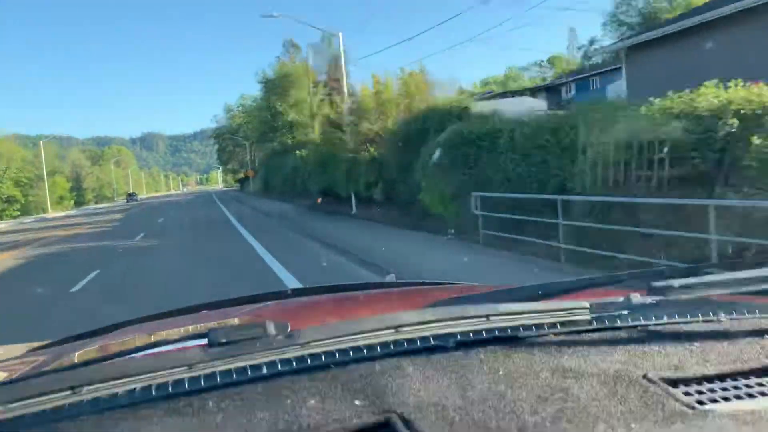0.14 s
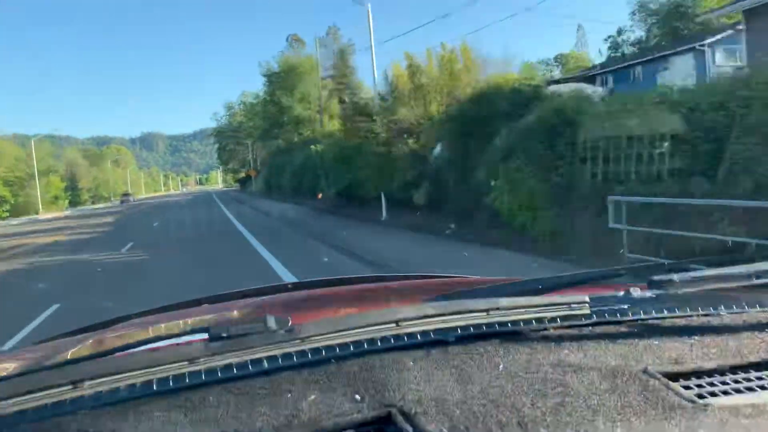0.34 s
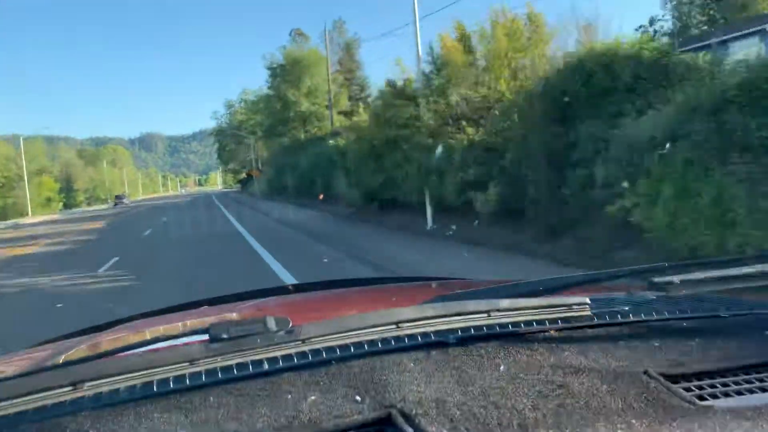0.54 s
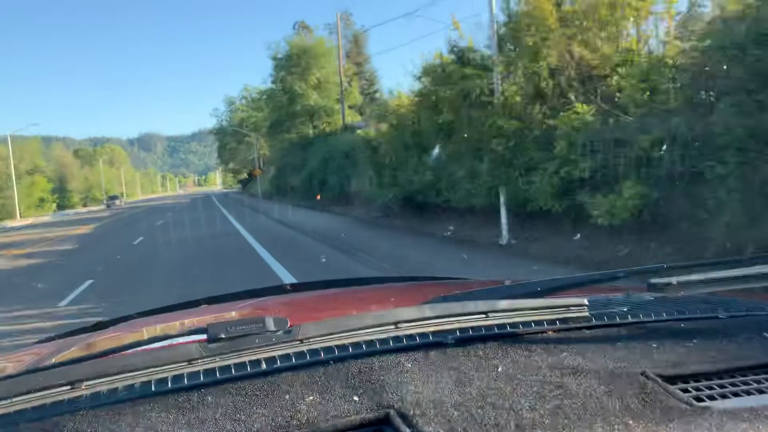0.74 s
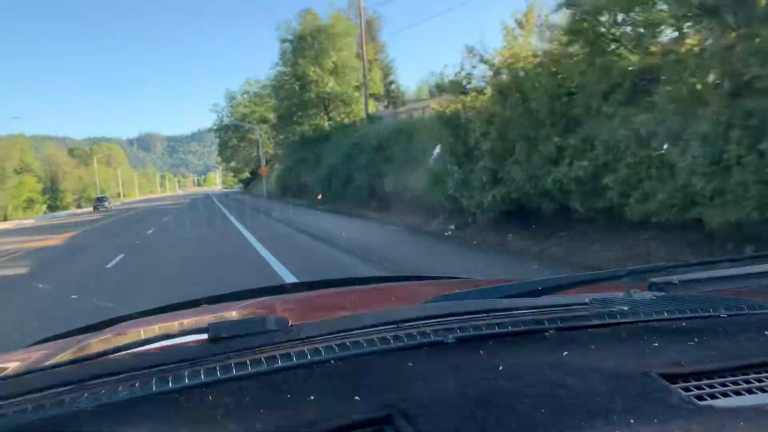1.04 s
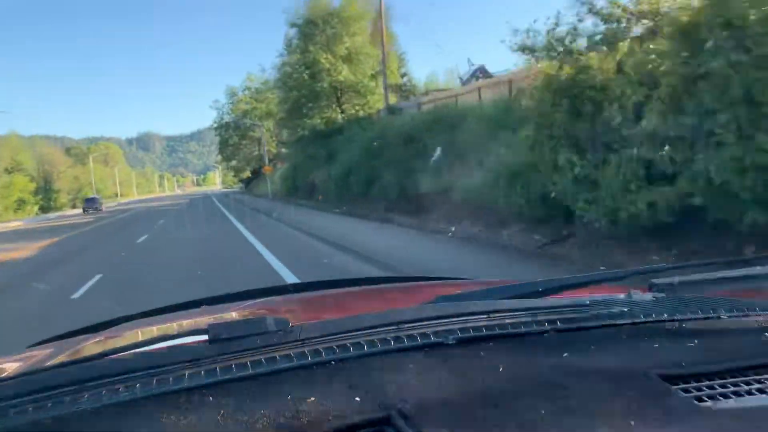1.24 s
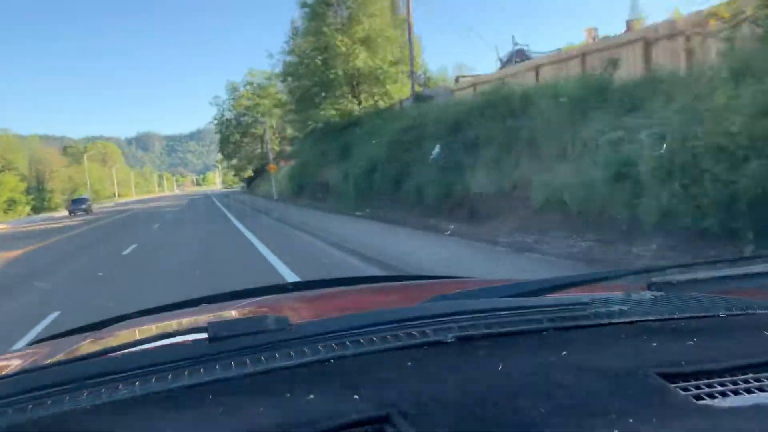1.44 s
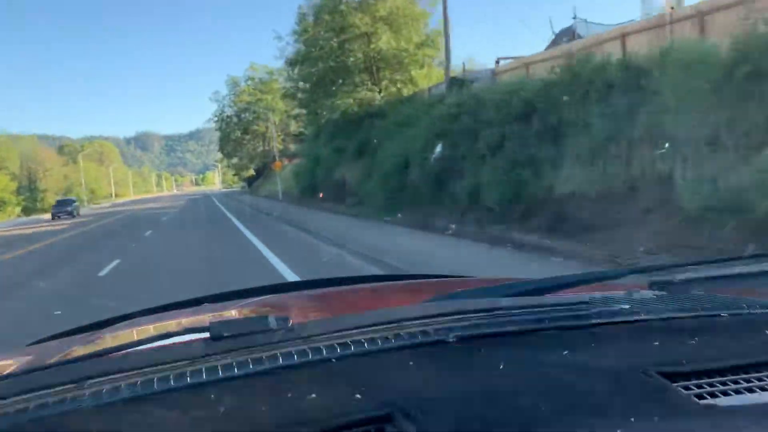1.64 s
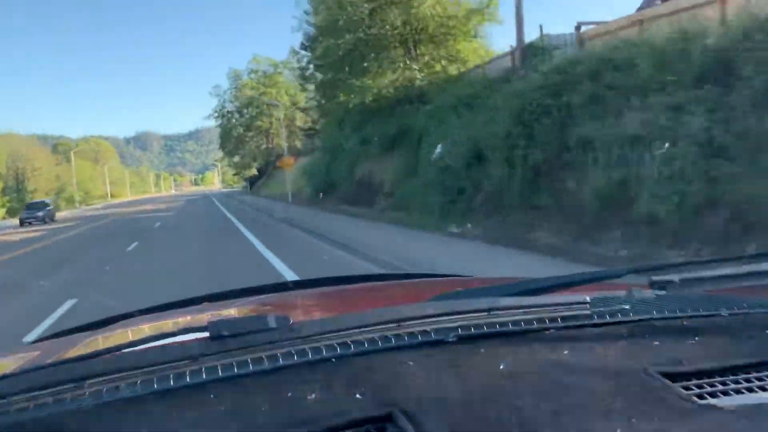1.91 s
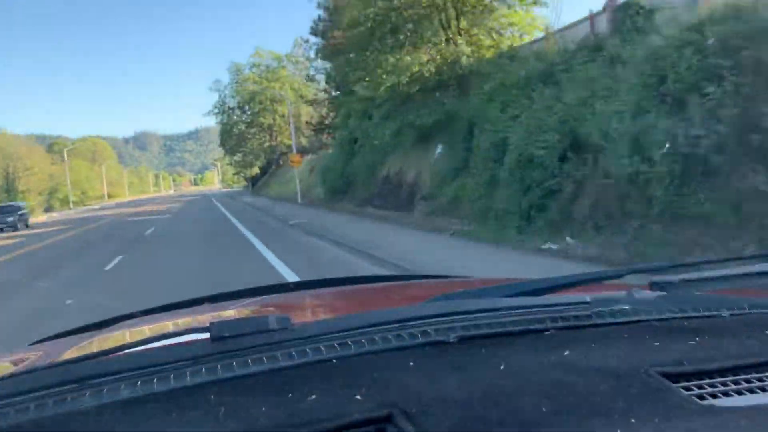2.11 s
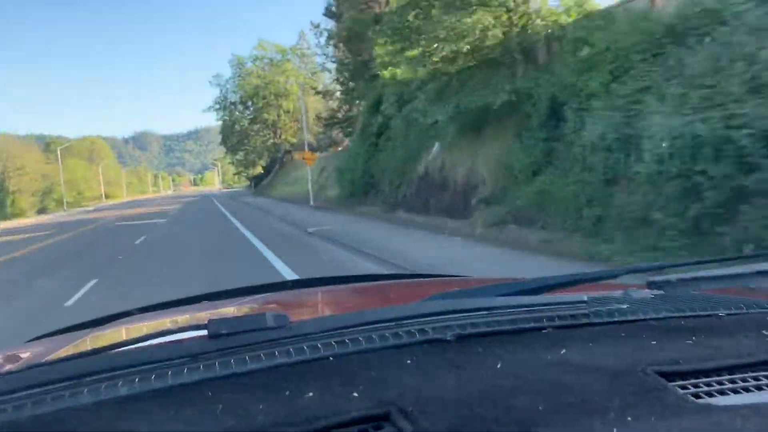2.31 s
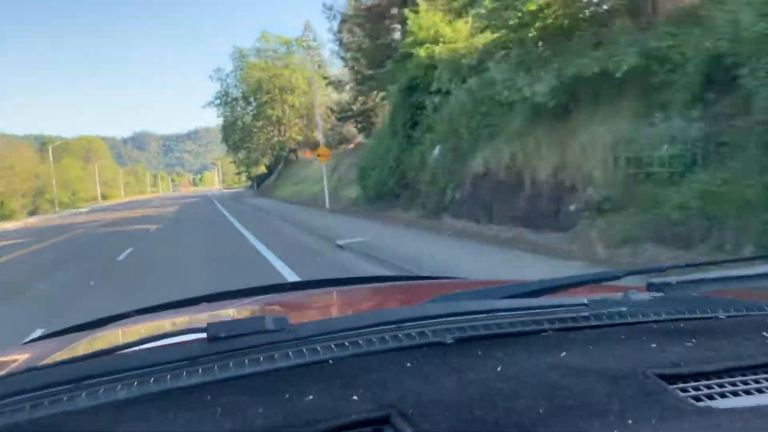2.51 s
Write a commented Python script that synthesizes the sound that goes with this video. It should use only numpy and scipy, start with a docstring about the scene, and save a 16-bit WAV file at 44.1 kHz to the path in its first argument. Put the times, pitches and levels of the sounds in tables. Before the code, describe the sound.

Turbo diesel truck engine heard inside the moving cab: a fading hiss from the last shift, deep boom and growl building with a rising turbo whistle, then throttle lift and a bright blow-off hiss ending in a squeal.

```python
"""Inside the cab of a six-cylinder turbo diesel pickup pulling through a gear. The air of the last shift dies away,
the engine booms on multiples of its crank speed, then growls as boost builds, and the turbo whistle, a narrow
moving noise band, dips and climbs. The throttle closes and the blow-off valve dumps the boost in a hiss of
coloured noise that breaks into a squeal. Road rumble and tyre roar are coloured noise, with a few dull bumps."""
import sys
import numpy as np
from scipy import signal
from scipy.fft import rfft, irfft
from scipy.io import wavfile

SR = 44100
rng = np.random.default_rng(int(sys.argv[2]) if len(sys.argv) > 2 else 0)


def dump_mix(stems):
    """Bounce the given channels to the path in sys.argv[1] as a 16-bit WAV at rate SR."""
    frames = np.atleast_2d(stems).T  # one column per channel
    limited = np.clip(frames, -1, 1)  # hard clip at full scale
    pcm = np.round(limited * 32767).astype(np.int16)
    wavfile.write(sys.argv[1], SR, pcm)


N = 117747

# Engine speed. Each row: time in seconds, firings per second.
FIRING = [(0, 94.6), (.55, 93.6), (.8, 95.7), (1.0, 96.7), (1.25, 97.3), (1.5, 98.9), (1.75, 100.7),
          (2.05, 102.2), (2.35, 103.1), (2.67, 102.7)]


def undb(db):
    """Decibels to gain."""
    return 10 ** (np.asarray(db) / 20)


def clock():
    """Time of each sample in seconds."""
    return np.arange(N) / SR


def curve(rows):
    """A time table, joined by straight lines."""
    rows = np.array(rows)
    return np.interp(clock(), rows[:, 0], rows[:, 1])


def at(rows, hz):
    """Read a spectrum on a log-frequency axis."""
    rows = np.array(rows)
    return np.interp(np.log(hz + 1e-9), np.log(rows[:, 0]), rows[:, 1])


def shape(x, gain_at):
    """Filter a signal by a gain over frequency."""
    return irfft(rfft(x) * gain_at(np.fft.rfftfreq(N, 1 / SR)), N)


def noise(gain_at):
    """Unit noise with the given gain over frequency."""
    x = shape(rng.standard_normal(N), gain_at)
    return x / x.std()


def walk(rate_hz):
    """Smooth random wander of unit spread."""
    return noise(lambda f: 1 / (1 + (f / rate_hz) ** 4))


def air(colour):
    """Coloured stereo noise, as wide as the cab makes it."""
    # Stereo width in the cab. Each row: frequency in Hz, side minus mid in dB.
    cab_width = [(25, 5), (60, -14), (105, -26), (180, -4), (350, -1.5), (700, 5.5), (1300, 1.5),
                 (2500, -2.5), (5000, 1), (15000, -7)]
    mid = noise(lambda f: undb(at(colour, f)))
    side = noise(lambda f: undb(at(colour, f)))
    side = shape(side, lambda f: undb(at(cab_width, f)))
    return np.array([mid + side, mid - side])


def band(hz, width_hz):
    """A narrow stereo band of noise around a fixed or moving centre."""
    phase = 2 * np.pi * np.cumsum(hz * np.ones(N)) / SR
    skirt = lambda f: 1 / (1 + (f / width_hz) ** 2)
    return np.array([noise(skirt) * np.cos(phase) + noise(skirt) * np.sin(phase) for _ in range(2)])


def swell(centre, length):
    """A bell-shaped rise and fall."""
    return np.exp(-((clock() - centre) / length) ** 2)


def pan(db):
    """Channel gains for a left-minus-right level."""
    return undb(np.array([[db], [-db]]) / 2)


def crank_tone(crank, multiple, rough, offset=0):
    """One multiple of the crank rotation, wavering in strength and phase."""
    # Cab standing waves put the ears out of step. Each row: frequency in Hz, left ear's lead in radians.
    ear_lead = [(60, .05), (100, 0.12), (200, 1.37), (288, 2), (312, 2.7), (400, 1.33), (550, 0.95),
                (800, 2), (1400, 0.54)]
    last_crank_hz = FIRING[-1][1] / 3
    lead = at(ear_lead, multiple * last_crank_hz) * np.array([[.5], [-.5]])
    waver = 1 + rough * (walk(14) + 1j * walk(14))
    return -np.sqrt(2) * np.real(waver * np.exp(1j * (multiple * crank + offset + lead)))


def engine(crank):
    """Boom and drone of the firings, the lope, and a growl that changes with boost and throttle."""
    # Exhaust boom at the firing rate. Each row: time in seconds, level in dB.
    boom_level = [(0, -37), (.55, -41), (.7, -18), (.8, -13.5), (.92, -10.5), (1.5, -11.5), (2.1, -10),
                  (2.28, -11), (2.4, -14), (2.55, -17.5), (2.67, -23.5)]
    # Drone at twice the firing rate. Each row: time in seconds, level in dB.
    drone_level = [(0, -23.5), (.25, -21), (.55, -22), (.8, -21.5), (1.0, -17.5), (1.55, -17.5),
                   (1.75, -15.5), (1.9, -12), (2.13, -12.5), (2.23, -21.5), (2.67, -32)]
    # Lope of uneven cylinders. Each row: multiple of crank speed, level in dB at the loudest boom.
    lope_orders = [(1, -70), (2, -22)]
    # Balance of the growl. Each row: multiple of crank speed, then relative level in dB
    # at low boost, at full boost and off throttle.
    growl_orders = [(4, -11, -4, 2), (5, -15, -18, -3), (7, -6, -8, 0), (8, -4, -12, -5), (9, -5, -9, 1),
                    (10, -10, -11, -14), (11, -12, -3, 0), (12, 2, .5, -4), (13, -14, -6, -2),
                    (14, -10, -7, -7), (15, -7, -9, -14), (16, -17, -7, -6), (18, -18, -18, -26),
                    (24, -19, -19, -25), (25, -18, -21, -28), (40, -22, -20, -17)]
    # Orders that swell or sink for a moment within the growl.
    # Each row: centre in seconds, length in seconds, multiple of crank speed, change in dB.
    order_swells = [(2.05, .13, 13, 7), (2.04, .09, 15, 6), (2.42, .075, 13, 7), (2.42, .08, 16, 3),
                    (2.47, .09, 11, -12)]
    # Level of the whole growl. Each row: time in seconds, level in dB.
    growl_level = [(0, -35), (.65, -38), (.9, -25), (1.45, -22.5), (1.7, -19.5), (1.9, -16.5), (2.1, -15),
                   (2.22, -17), (2.44, -17.5), (2.55, -25), (2.67, -27)]
    low_boost_s, full_boost_s, lift_s, lift_takes_s = 1.34, 1.78, 2.124, 0.045
    cab_smear = -.7  # radians per squared multiple: higher orders arrive later, spreading each turn's pulse

    t = clock()
    boom_db = curve(boom_level)
    out = undb(boom_db) * crank_tone(crank, 3, rough=.025)
    out = out + undb(curve(drone_level)) * crank_tone(crank, 6, rough=.06)

    # the lope follows the boom at half its range in dB
    loudest_db = max(db for _, db in boom_level)
    pulling = undb(np.minimum(boom_db - loudest_db, 0) / 2)
    for k, db in lope_orders:
        tone = crank_tone(crank, k, rough=0.082, offset=rng.uniform(0, 2 * np.pi))
        out = out + pulling * undb(db) * tone

    boost = np.clip((t - low_boost_s) / (full_boost_s - low_boost_s), 0, 1)
    lift = np.clip((t - lift_s) / lift_takes_s, 0, 1)
    growl, power = 0, 0
    for k, low, full, off in growl_orders:
        gain = undb((low + boost * (full - low)) * (1 - lift) + off * lift)
        swell_db = sum(db * swell(centre, length)
                       for centre, length, multiple, db in order_swells if multiple == k)
        gain = gain * undb(swell_db)
        scatter = cab_smear * k ** 2 + .4 * rng.standard_normal()
        growl = growl - gain * crank_tone(crank - np.pi / 3, k, rough=.12, offset=scatter)
        power = power + gain ** 2
    return out + undb(curve(growl_level)) * growl / np.sqrt(power)


def roar():
    """Short rough surges of engine roar under load, each a swelling band of noise."""
    # Each row: centre in seconds, length in seconds, pitch in Hz, width in Hz, level in dB.
    roars = [(.98, 0.067, 1688, 545, -33.5), (1.197, 0.024, 1700, 450, -36.5),
             (1.895, 0.022, 1685, 550, -29), (2.027, 0.018, 2890, 350, -32), (2.1, 0.027, 2940, 300, -35)]
    return sum(band(hz, width) * swell(centre, length) * undb(db)
               for centre, length, hz, width, db in roars)


def clatter(crank, firing_depth=0.28, turn_depth=0.15):
    """Combustion noise and roar that pulse with each firing and each crank turn."""
    # Combustion clatter. Each row: time in seconds, level in dB.
    clatter_level = [(0, -40.5), (.27, -36.5), (.42, -46.5), (.75, -42), (.87, -33.5), (1.1, -35.5),
                     (1.45, -29.5), (1.65, -28.5), (1.92, -26), (2.15, -28), (2.4, -31.5), (2.67, -38.5)]
    # Its colour. Each row: frequency in Hz, relative level in dB per Hz.
    clatter_colour = [(200, 6.5), (350, 17), (550, 1), (700, -42), (1000, -1), (1400, -1.5), (2200, 0),
                      (3200, -5.5), (4500, -12.5), (7000, -19.5), (15000, -38)]
    firing = np.cos(3 * crank)
    gate = np.exp(firing_depth * firing + turn_depth * np.cos(crank))
    gate = gate / np.sqrt(np.mean(gate ** 2))
    combustion = air(clatter_colour) * undb(curve(clatter_level))
    return (combustion + roar()) * gate


def turbo(flutter_db=0.2):
    """Blade whistle that blurs with speed, a whoosh just under its pitch, and the rush in the intake pipe."""
    # Whistle pitch. Each row: time in seconds, frequency in Hz.
    whistle_pitch = [(0, 10150), (.07, 9600), (.15, 8300), (.25, 7300), (.42, 6500), (.62, 6130),
                     (.75, 6280), (.9, 6750), (1.1, 7500), (1.3, 8350), (1.55, 9300), (1.8, 10400),
                     (2.0, 11350), (2.15, 11900), (2.28, 12000), (2.38, 11550), (2.49, 10350), (2.56, 9750),
                     (2.67, 9350)]
    # Whistle loudness. Each row: time in seconds, level in dB before panning.
    whistle_level = [(0, -37), (.08, -37), (.14, -46), (.3, -56), (.62, -53), (.9, -55.5), (1.1, -50),
                     (1.8, -45), (2.25, -50), (2.4, -37.5), (2.5, -36.5), (2.63, -35), (2.67, -43)]
    # Compressor whooshes. Each row: centre in seconds, length in seconds, level in dB before panning.
    whooshes = [(0.042, 0.054, -27.5), (1.62, 0.52, -41.5), (2.59, 0.087, -32)]
    # Air rushing through the compressor. Each row: time in seconds, level in dB before panning.
    intake_level = [(0, -36.5), (.35, -51.5), (.7, -53), (1.0, -48.5), (1.4, -46.5), (1.8, -40.5),
                    (2.05, -41), (2.22, -44), (2.67, -37.5)]
    # Colour of the intake pipe. Each row: frequency in Hz, relative level in dB per Hz.
    intake_colour = [(2500, -12), (4500, -2), (6000, -3), (7700, -7), (8100, 1.5), (8500, -.5), (9800, 0),
                     (11000, -5), (15000, -13)]
    clean_hz, blurred_hz = 6000, 13500
    whoosh_ratio = .96  # of the whistle pitch

    hz = curve(whistle_pitch)
    blur = np.clip((hz - clean_hz) / (blurred_hz - clean_hz), 0, 1)
    blades = np.sqrt(1 - blur) * band(hz, width_hz=40) + np.sqrt(blur) * band(hz, width_hz=140)
    whistle = blades * undb(curve(whistle_level)) * pan(db=-3)
    whoosh_gain = sum(undb(db) * swell(centre, length) for centre, length, db in whooshes)
    whoosh = band(hz * whoosh_ratio, width_hz=580) * whoosh_gain * pan(db=-8.0)
    rush = air(intake_colour) * undb(curve(intake_level)) * pan(db=-2.0)
    return (whistle + whoosh) * undb(flutter_db * walk(40)) + rush


def blow_off(flutter_db=0.34, squeal_flutter_db=2):
    """The valve opens, hisses and rings its pipe as the pressure sags, surges once, squeals and closes."""
    # Valve openings, the first already under way.
    # Each row: start in seconds, base level in dB, extra fall on closing in dB per second.
    dumps = [(-.3, -29, 92), (2.245, -32.5, 79)]
    # Colour of the hiss. Each row: frequency in Hz, relative level in dB per Hz.
    dump_colour = [(800, -12), (2000, -4), (3500, -4.5), (7700, -3.5), (8150, 3), (8800, 1.5), (10500, -.5),
                   (13000, -4.5), (15500, -7)]
    # The valve seat squeals as the pressure falls. Each row: centre in seconds, length in seconds,
    # pitch in Hz, width in Hz, level in dB before flutter, left minus right in dB.
    squeals = [(2.494, 0.04, 8100, 110, -25.5, -6), (2.524, 0.021, 8850, 400, -30, -8)]
    attack_s, hold_s, closes_s, sag_db_per_s = 0.05, 0.22, 0.38, 22
    tail_db, tail_db_per_s = -1.5, 58.5  # a second share of the flow that fades from the start
    pipe_hz, pipe_width_hz, pipe_db = 2920, 280, -11.5  # valve outlet resonance, relative to the hiss
    surge_db = 4

    surge = swell(centre=2.39, length=0.018)
    hiss = 0
    for start, db, close_db_per_s in dumps:
        age = clock() - start
        sag_db = sag_db_per_s * np.maximum(age - hold_s, 0)
        closing_db = close_db_per_s * np.maximum(age - closes_s, 0)
        flow = undb(-sag_db - closing_db) + undb(tail_db - tail_db_per_s * np.maximum(age, 0))
        # the surge lifts the pipe here and the whole hiss below
        jet = air(dump_colour) + band(pipe_hz, pipe_width_hz) * undb(pipe_db + surge_db * surge)
        hiss = hiss + jet * np.clip(age / attack_s, 0, 1) * undb(db) * flow
    hiss = hiss * pan(db=-1) * undb(surge_db * surge + flutter_db * walk(37))
    squeal = sum(band(hz, width) * swell(centre, length) * undb(db) * pan(pan_db)
                 for centre, length, hz, width, db, pan_db in squeals)
    return hiss + squeal * undb(squeal_flutter_db * walk(50))


def road(flutter_db=1.47, glide_hz_per_s=200):
    """Rumble and tyre roar in the cab, with a few dull bumps that sink in pitch."""
    # Rumble, heavier on the rough stretch at first. Each row: time in seconds, level in dB.
    rumble_level = [(0, -19.5), (.3, -19.5), (.6, -19.5), (.9, -22), (1.5, -22.5), (2.1, -24.5),
                    (2.4, -23.5), (2.67, -23.5)]
    # Its colour. Each row: frequency in Hz, relative level in dB per Hz.
    rumble_colour = [(15, -23), (33, -3), (45, -8), (62, 3.5), (80, -6), (115, -3), (150, -8), (185, -5.5),
                     (235, -14.5), (300, -91), (800, -83), (3000, -88)]
    # Colour of the tyre roar. Each row: frequency in Hz, relative level in dB per Hz.
    tyre_colour = [(200, -3), (300, -14), (420, 5), (620, -10), (800, -7.5), (980, -12.5), (1300, -9),
                   (2000, -23), (4000, -28.5), (6000, -32), (7400, -33), (15000, -79)]
    # Bumps in the road. Each row: centre in seconds, length in seconds, pitch at the centre in Hz,
    # peak level in dB.
    bumps = [(.265, 0.07, 143.4, -19.5), (.395, 0.081, 102.8, -14), (0.659, 0.054, 122.5, -16.5),
             (2.66, 0.05, 124, -14)]
    tyres_db = -30

    rumble = air(rumble_colour) * undb(curve(rumble_level))
    tyres = air(tyre_colour) * undb(tyres_db + flutter_db * walk(18))
    out = rumble + tyres
    for centre, length, hz, db in bumps:
        age = clock() - centre
        cycles = (hz - glide_hz_per_s * age / 2) * age
        thud = np.sin(2 * np.pi * cycles + .5 * walk(38))
        out = out + undb(db) * swell(centre, length) * thud
    return out


def cab(x, echo_db=-3, decay_s=0.02, count=10):
    """Close reflections off glass and dashboard ripple the spectrum, differently at each ear."""
    out = []
    for channel in x:
        lags = rng.uniform(.0003, .008, count)  # seconds
        gains = rng.standard_normal(count) * np.exp(-lags / decay_s)
        gains = gains * undb(echo_db) / np.linalg.norm(gains)
        taps = np.bincount((lags * SR).astype(int), gains)
        taps[0] = 1  # direct sound
        out.append(signal.fftconvolve(channel, taps / np.linalg.norm(taps))[:N])
    return np.array(out)


def scene():
    """Engine, turbo, valve and road together; three firings to a crank turn."""
    crank = 2 * np.pi * np.cumsum(curve(FIRING) / 3) / SR
    return engine(crank) + road() + cab(clatter(crank) + turbo() + blow_off())


def record(dry):
    """The recorder rounds the highest peaks and cuts the top."""
    top_hz = 14600
    rounded = dry / (1 + (dry / .95) ** 8) ** (1 / 8)
    return signal.sosfilt(signal.ellip(8, .2, 70, top_hz, fs=SR, output="sos"), rounded)


dry = scene()
out = record(dry)
dump_mix(out)
```